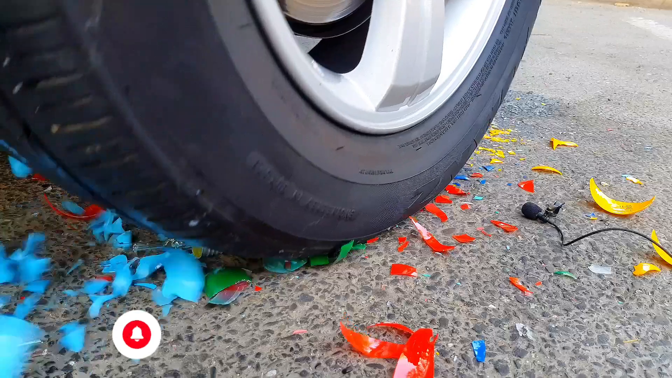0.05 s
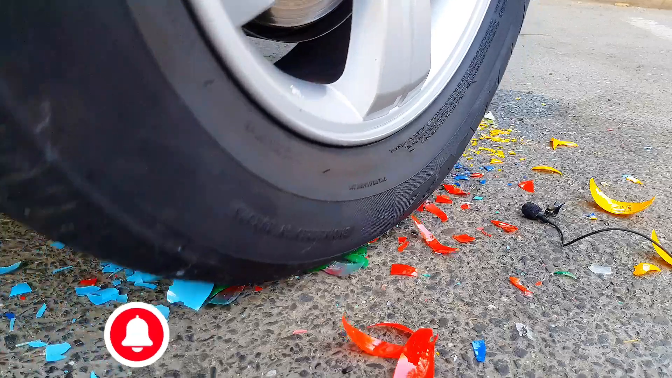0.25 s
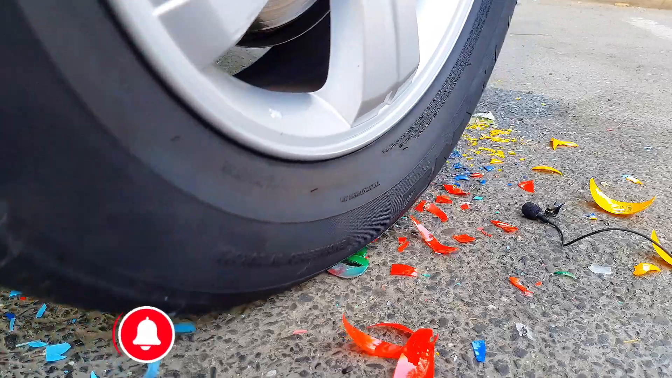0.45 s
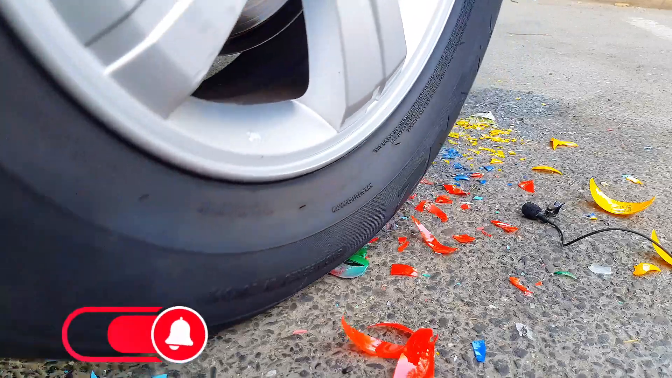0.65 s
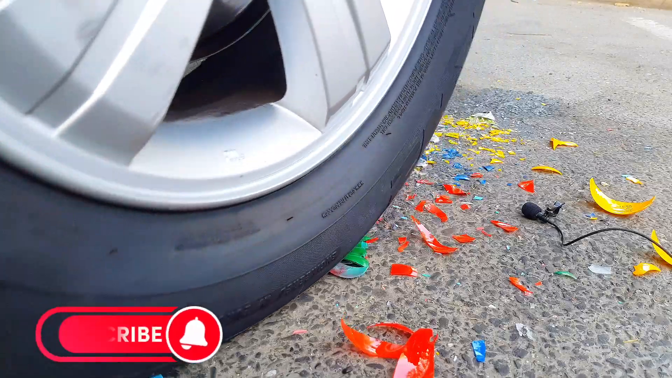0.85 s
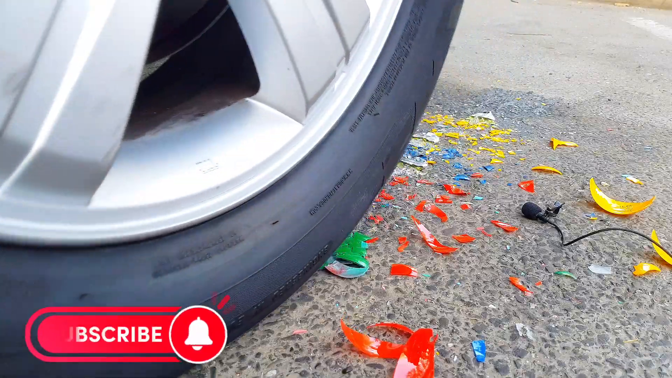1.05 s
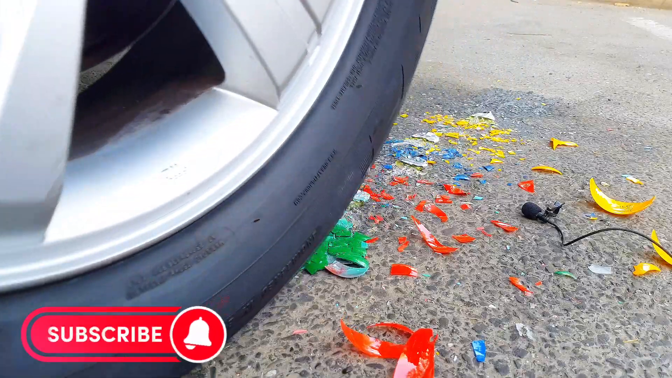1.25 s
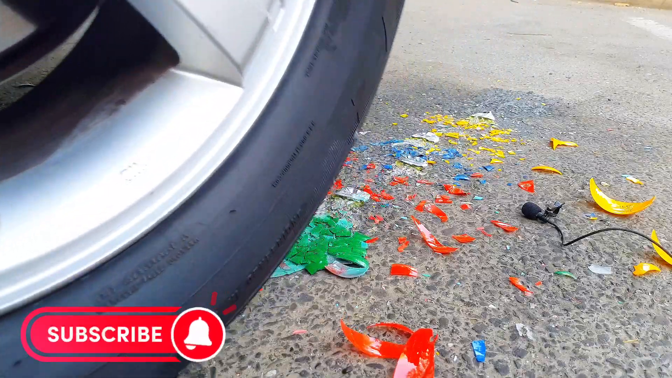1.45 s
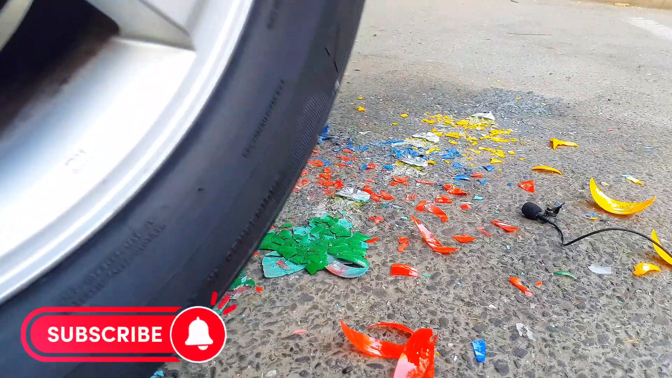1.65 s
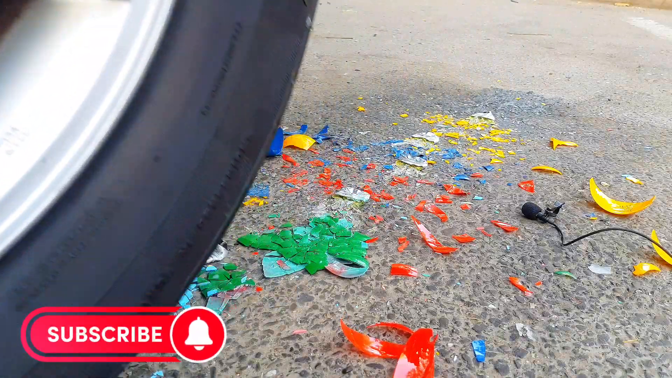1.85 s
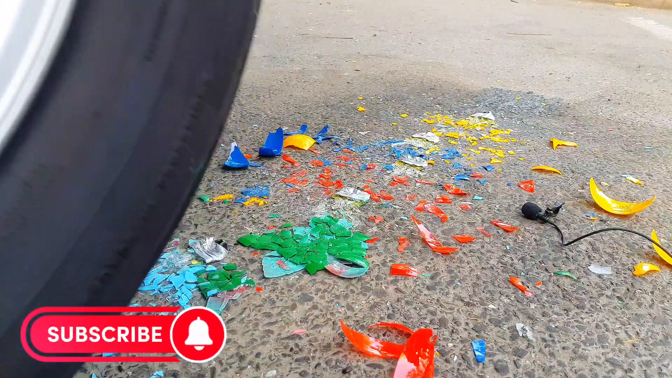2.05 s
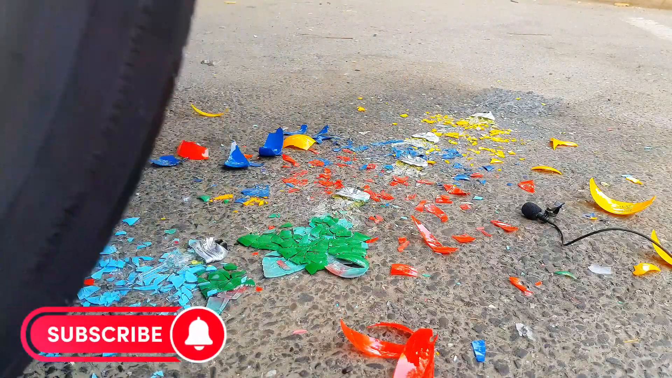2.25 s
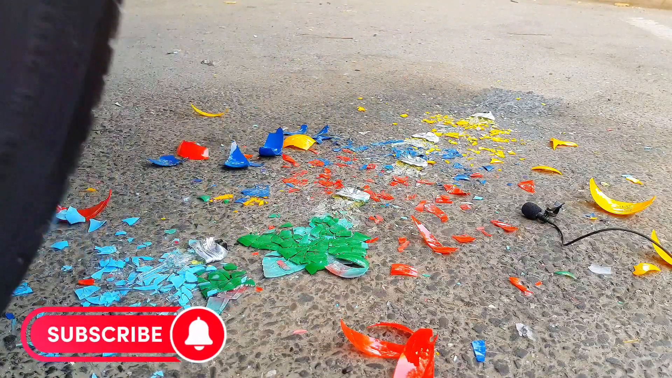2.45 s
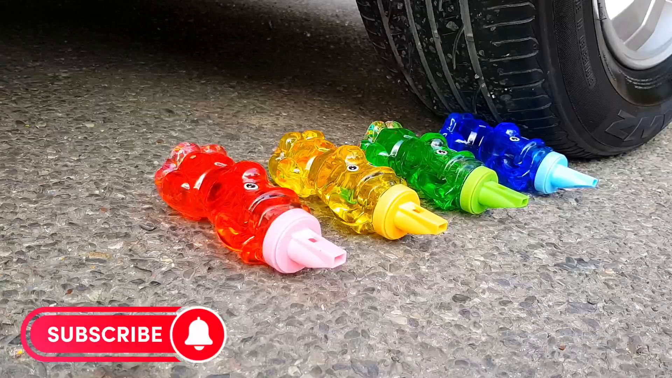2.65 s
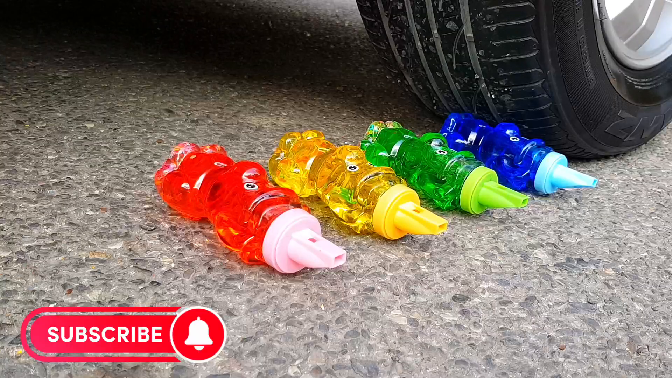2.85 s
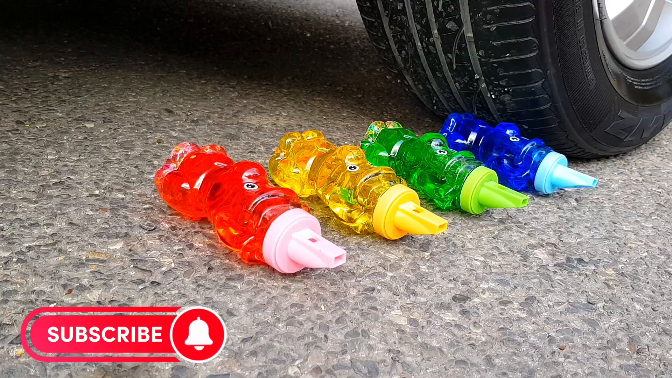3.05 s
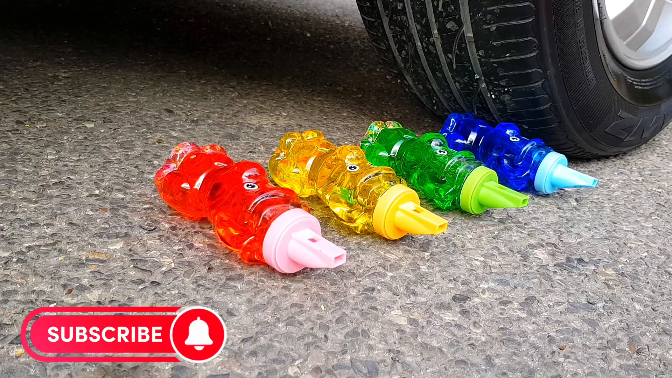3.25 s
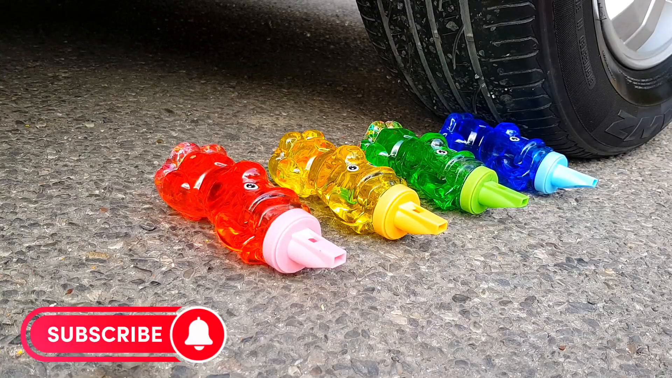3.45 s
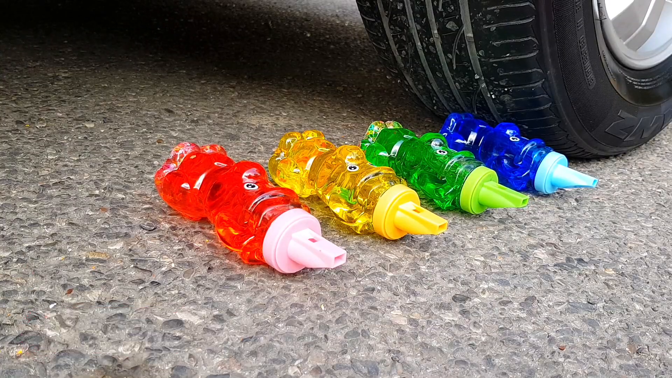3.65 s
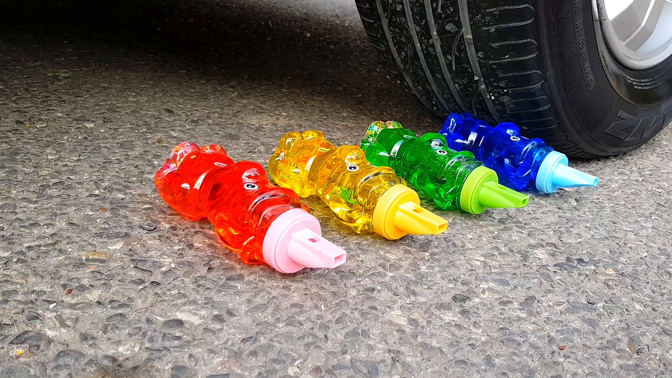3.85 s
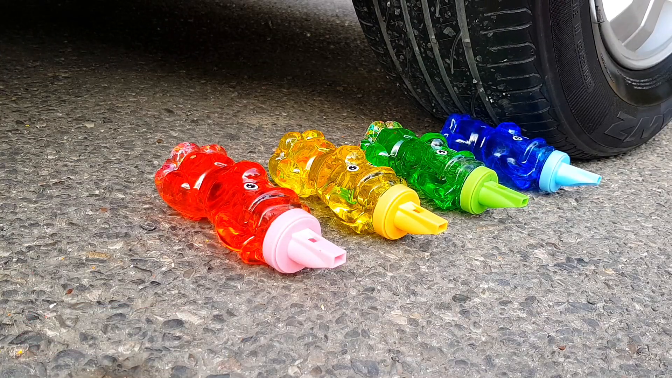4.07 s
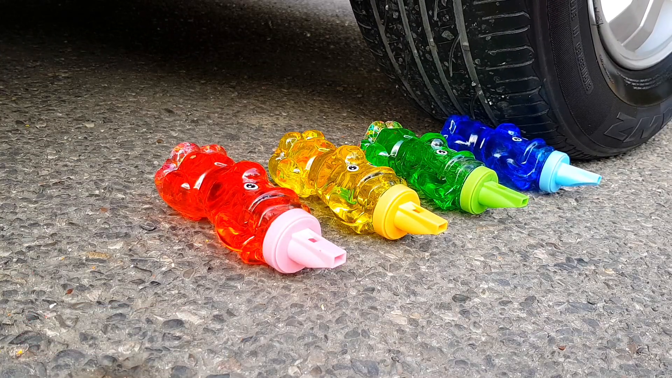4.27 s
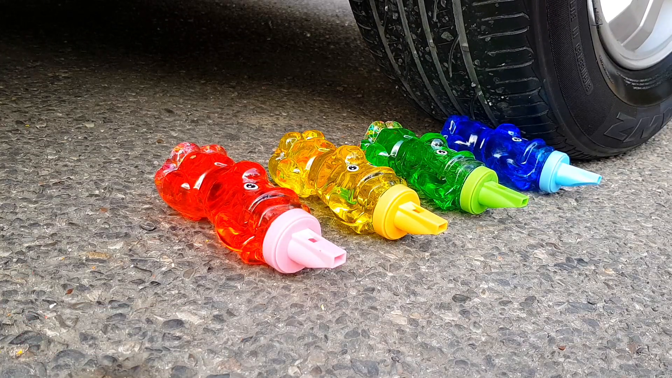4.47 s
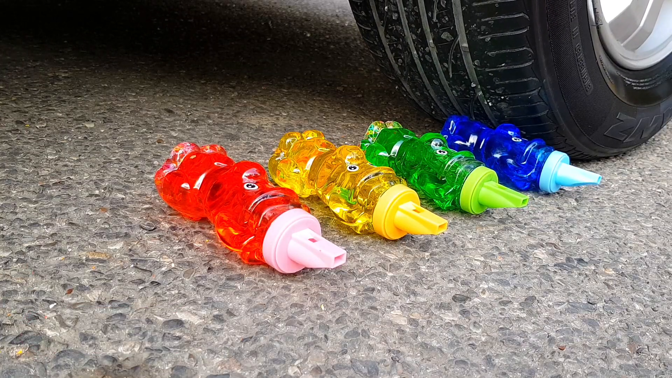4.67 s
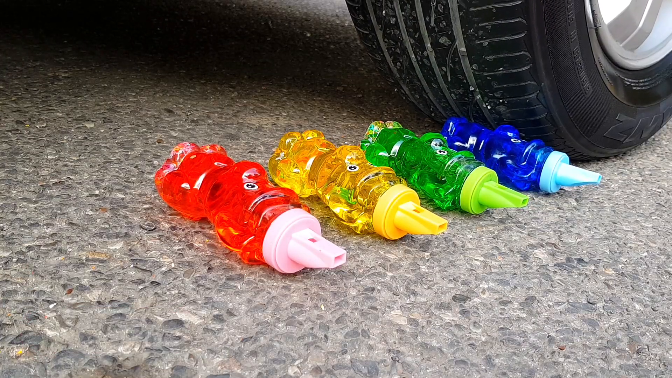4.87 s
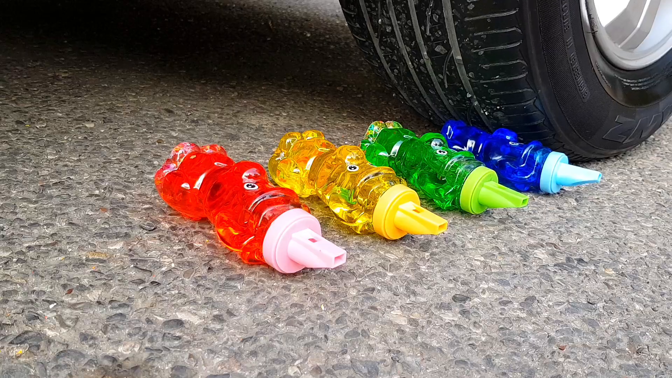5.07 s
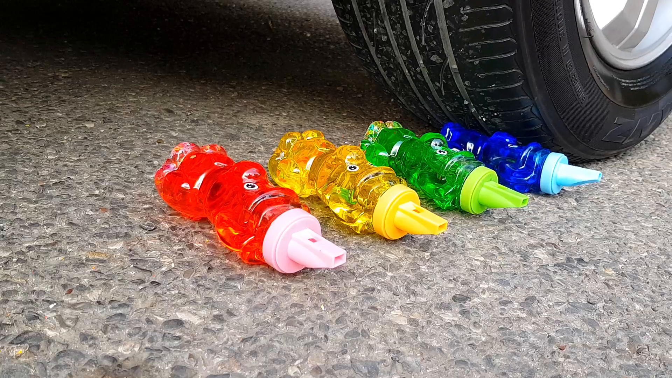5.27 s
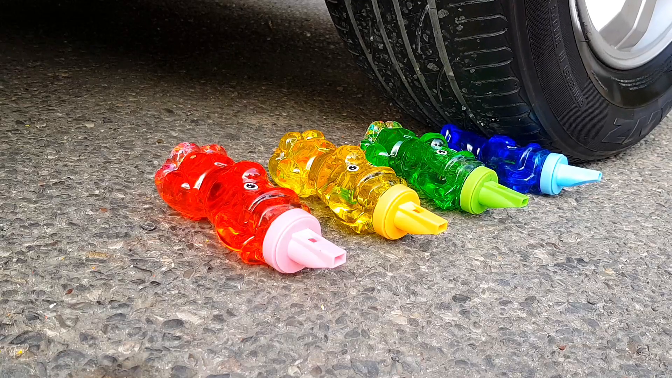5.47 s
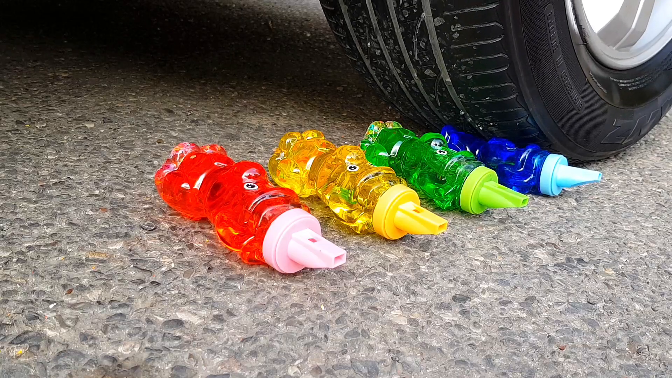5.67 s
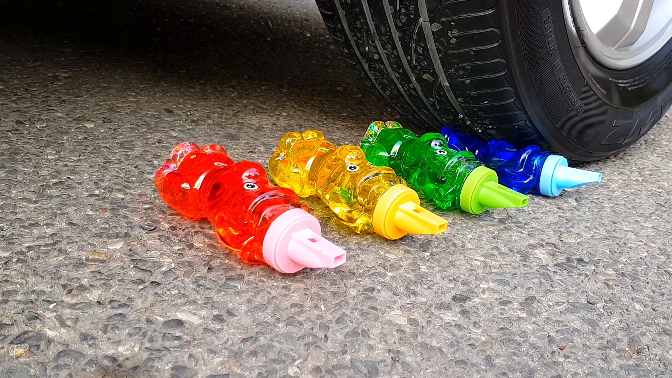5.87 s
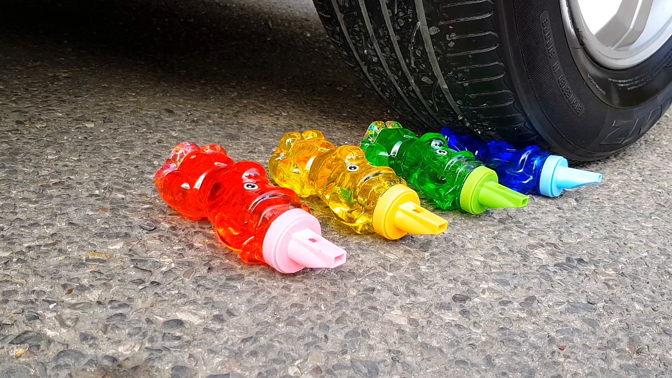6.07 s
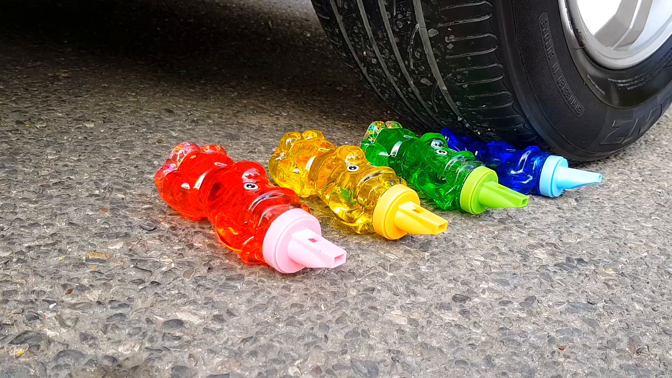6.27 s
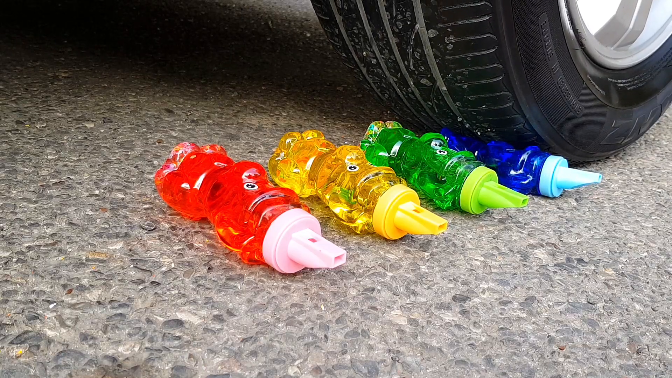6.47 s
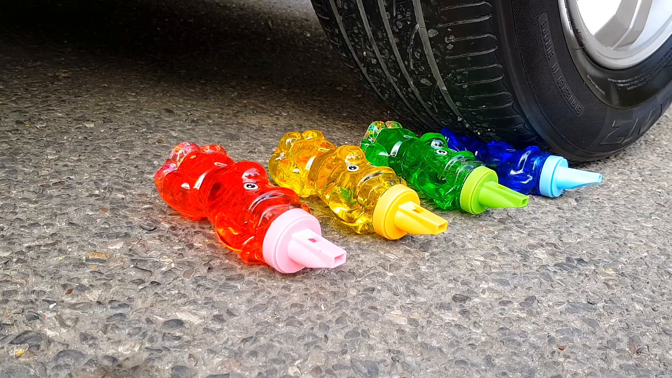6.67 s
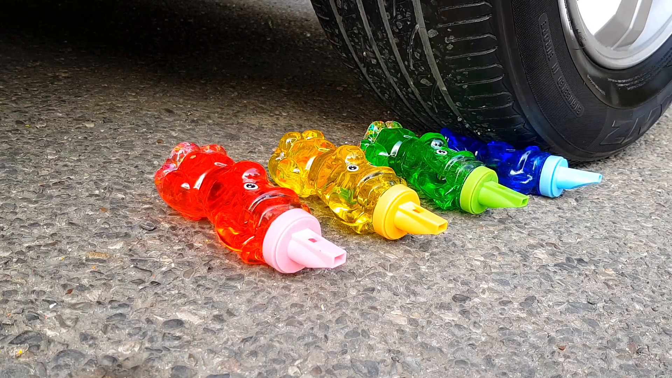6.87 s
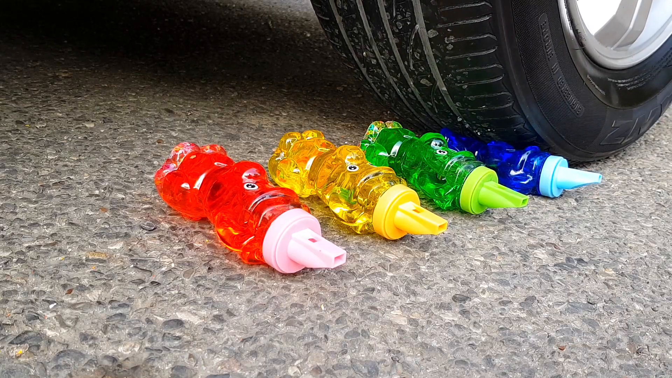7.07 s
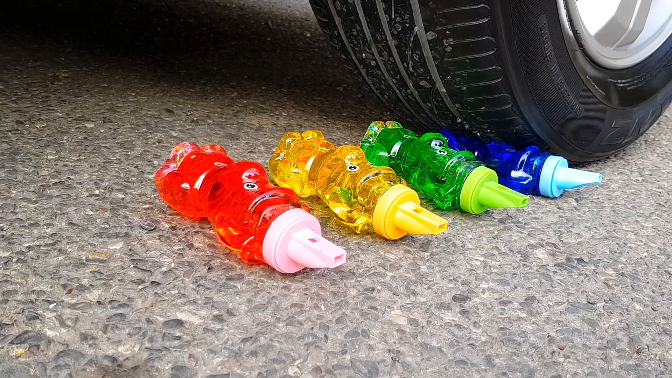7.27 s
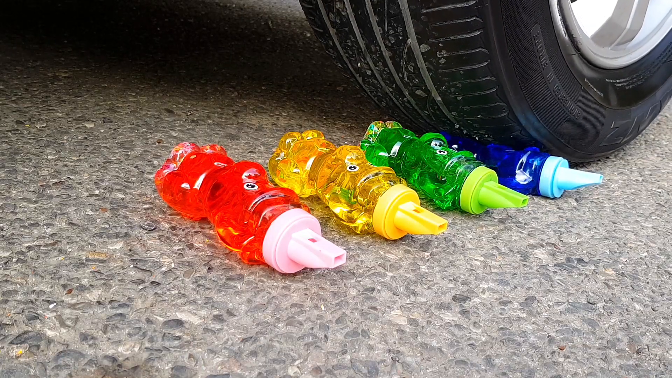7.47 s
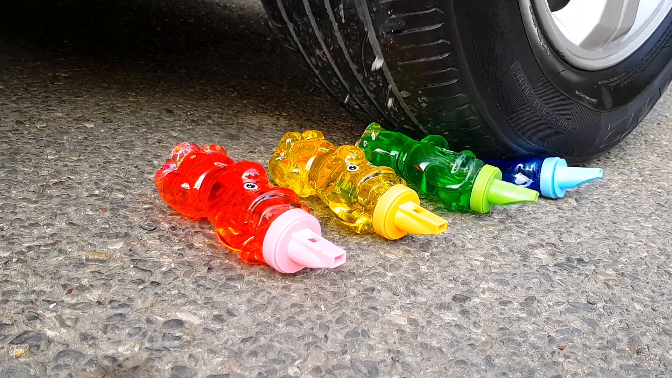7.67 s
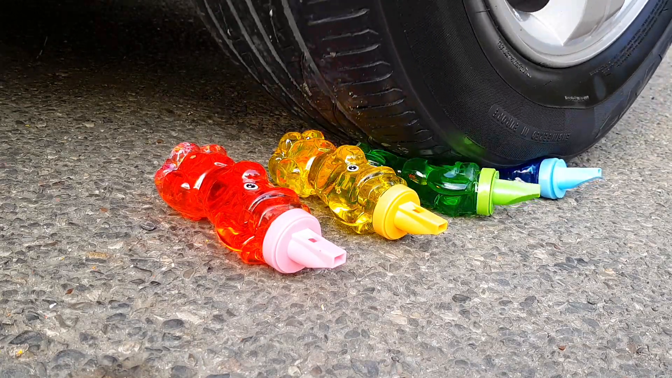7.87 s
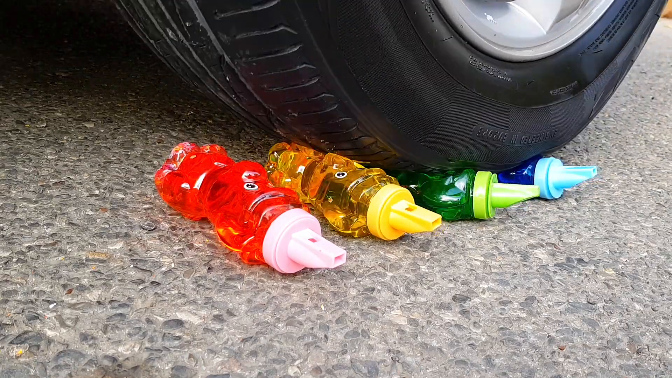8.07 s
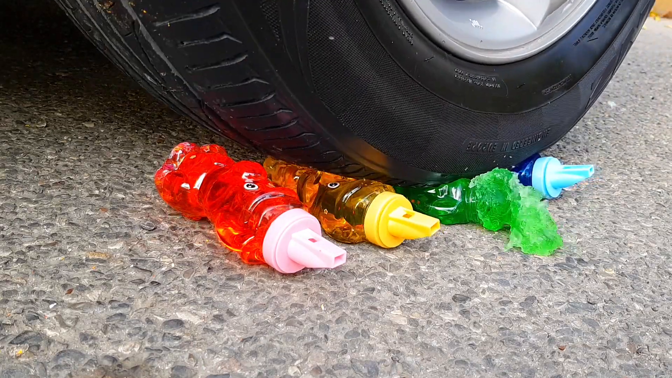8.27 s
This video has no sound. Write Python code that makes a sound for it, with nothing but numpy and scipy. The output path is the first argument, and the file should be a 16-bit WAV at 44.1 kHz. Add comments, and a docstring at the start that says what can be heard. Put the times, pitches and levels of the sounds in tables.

```python
"""Glass bulbs pop, crack and crunch on asphalt under the tyre of a creeping car, and loose shards tinkle.
Then, heard from closer to the engine, the car idles, revs up and climbs onto a row of jelly-filled
plastic bottles, which snap, burst and squirt. Breaks are filtered clicks with crumbling noise tails,
hollows and shards are damped sinusoids, grinding is a random train of grains, and the engine sums
harmonics of its firing rate with resonant knocks and coloured noise."""
import sys
import numpy as np
from scipy import signal
from scipy.fft import rfft, irfft, next_fast_len
from scipy.io import wavfile

SR = 44100
rng = np.random.default_rng(int(sys.argv[2]) if len(sys.argv) > 2 else 0)


def wav_record(signal):
    """Record a signal, one row per channel, as 16-bit PCM in the file named by sys.argv[1]."""
    frames = np.transpose(np.atleast_2d(signal))
    bounded = np.clip(frames, -1, 1)
    # unit amplitude maps onto the largest positive 16-bit level
    quanta = np.round(bounded * 32767).astype(np.int16)
    wavfile.write(sys.argv[1], SR, quanta)


N = 366900
TIME = np.arange(N) / SR
MOVE_S = 2.625  # the listening place moves from the bulbs to the bottles


def from_db(db):
    """Level to amplitude: 20 dB is a factor of ten."""
    return 10 ** (np.asarray(db) / 20)


def rms_one(x):
    """Normalisation of signal power: scale to rms 1."""
    return x / np.sqrt(np.mean(x ** 2) + 1e-20)


def in_time(rows):
    """Linear interpolation over time: one curve for each column after t/s."""
    s, *columns = np.transpose(rows)
    return [np.interp(TIME, s, column) for column in columns]


def add(out, s, sound):
    """Superposition: mix a sound in at a time in s."""
    at = max(round(s * SR), 0)
    out[..., at:at + sound.shape[-1]] += sound[..., :N - at]


def band(x, low_hz, high_hz):
    """Causal band-pass filtering."""
    edges_hz = [low_hz, min(high_hz, SR / 2 - 2000)]
    return signal.sosfilt(signal.butter(2, edges_hz, "band", fs=SR, output="sos"), x)


def resonate(x, hz, width_hz):
    """Resonance: a peak filter passes a narrow band around its centre."""
    return signal.lfilter(*signal.iirpeak(hz, hz / width_hz, fs=SR), x)


def colour(x, spectrum):
    """Minimum-phase filtering: the spectrum is met without sounding early; rms 1."""
    size = next_fast_len(N + SR // 2, True) // 2 * 2
    hz, db = np.transpose(spectrum)
    log_hz = np.log(np.maximum(np.arange(size // 2 + 1) * SR / size, 1))
    # outside the listed range the gain falls by 12 dB per octave
    beyond = np.abs(log_hz - np.clip(log_hz, np.log(hz[0]), np.log(hz[-1])))
    log_gain = np.log(from_db(np.interp(log_hz, np.log(hz), db))) - 2 * beyond
    # folding the cepstrum onto positive times gives minimum phase
    cepstrum = irfft(log_gain)
    cepstrum[size // 2:] = 0
    response = np.exp(2 * rfft(cepstrum))
    return rms_one(irfft(rfft(x, size) * response)[..., :N])


def drift(per_s):
    """Low-rate random modulation: lines between random knots, rms 1."""
    knots = rng.standard_normal(4000)
    return rms_one(np.interp(TIME * per_s, np.arange(len(knots)), knots))


def grains(per_s, spread_db):
    """Random impulse train: signed tiny breaks; a positive spread makes a few of them strong."""
    sizes = from_db(spread_db * np.minimum(rng.exponential(1, N), 4)) * rng.choice([-1, 1], N)
    return sizes * (rng.random(N) < per_s / SR)


def place(x, left_db, lag_s=0):
    """Level and time differences between two microphone ports; the right one hears it later."""
    left, right = np.broadcast_to(x, (2, x.shape[-1]))
    steps, ratio = np.arange(len(left)), from_db(left_db)
    delayed = np.interp(steps - lag_s * SR, steps, right, left=0)
    return np.array([ratio * left, delayed]) * 2 / (1 + ratio)


def port_noise(diffuse, echo_db=-23.0):
    """Comb filtering by echoes of road and underbody, with a diffuse share of its own at each port."""
    share = np.clip(diffuse, 0, 1)
    common = np.sqrt(1 - share) * rng.standard_normal(N)
    noise = common + np.sqrt(share) * rng.standard_normal((2, N))
    echoes = sum(np.roll(noise, round(s * SR), axis=1) for s in (.0033, .0059, .0087))
    return noise + from_db(echo_db) * echoes


# spectrum of the street noise: f/Hz, relative density/dB
STREET_SPECTRUM = [(150, 9), (330, 2), (500, -6.5), (900, -8), (2000, -13), (5000, -18.5), (8500, -17.5),
                   (12000, -22), (16000, -29)]


def street(level_db=-51.0):
    """Stationary coloured noise: the steady background beside the bulbs."""
    return from_db(level_db) * colour(rng.standard_normal(N), STREET_SPECTRUM)


# idle speed, which hunts a little: t/s, firing rate/(1/s)
IDLE_RATE = [(0, 23.3), (2.2, 23.25), (2.65, 22.75), (3.0, 23.48), (4.2, 23.8), (4.9, 23.2), (5.6, 23.15),
             (6.6, 23.85), (7.1, 23.6)]
# one push on the throttle: the revs climb to a top, then coast down
REV_TOP_S, REV_GAIN_PER_S, REV_RISE_S, REV_FALL_S = 7.64, 18.7, .305, .38


def firing_rate():
    """Fundamental frequency in firings per s: idle plus a bell-shaped climb and a long coast down."""
    since_top = TIME - REV_TOP_S
    climb = np.exp(-(since_top / REV_RISE_S) ** 2)
    coast = 1 / (1 + (since_top / REV_FALL_S) ** 2)
    return in_time(IDLE_RATE)[0] + REV_GAIN_PER_S * np.where(since_top < 0, climb, coast)


# level by cylinder in firing order: relative level/dB
CYLINDER_LEVELS = [0, -7, -1.5, -4]
# spectrum of the valve ticks: f/Hz, relative density/dB
VALVE_SPECTRUM = [(1200, 1.5), (1850, 5), (2200, -7), (2600, 3.5), (4200, -5.5), (5200, -8)]


def valves(turns, t60=.06, vary_db=2.5):
    """Periodic impact noise: a dry valve-gear tick per firing, some cylinders louder than others."""
    firing = turns.astype(int)
    level_db = np.take(CYLINDER_LEVELS, firing, mode="wrap") + vary_db * rng.standard_normal(1000)[firing]
    age_s = turns % 1 / np.gradient(turns) / SR
    ticks = rng.standard_normal(N) * from_db(level_db - 60 * age_s / t60)
    return rms_one(colour(ticks, VALVE_SPECTRUM))


# lines of the belt drive: f/Hz, level/dB relative to the coloured whirr
BELT_LINES = [(1809, -20), (3957, -20), (4081, -31), (4221, -19.5), (6363, -21.5)]


def whine(width_hz=16.0):
    """Narrow-band noise: belt and pulleys sing in faint, unsteady lines."""
    out = 0
    for hz, db in BELT_LINES:
        out = out + from_db(db) * rms_one(resonate(rng.standard_normal(N), hz, width_hz))
    return out


# spectrum of the whirr: f/Hz, relative density/dB
WHIRR_SPECTRUM = [(290, -14.5), (500, -5.5), (761, -7.5), (906, -11.5), (1280, -11), (1820, -12.5),
                  (2570, -17), (3020, -17), (4090, -19), (4730, -22.5), (7420, -20), (8830, -30.5),
                  (12500, -19), (15100, -24), (16000, -27)]
# ringing parts of the engine bay: f/Hz, bandwidth/Hz, relative level/dB
BAY_RESONANCES = [(1780, 590, 1.5), (2490, 69, 2), (3390, 250, -4.5)]


def engine_bay(turns, bay_db=-10.5, rattle_db=-13.5, valve_db=-9.5):
    """Resonance excited by noise: whirr, ringing parts and rattle, with valve ticks and belt whine."""
    air = port_noise(diffuse=0.83)
    bay = rms_one(sum(from_db(db) * resonate(air, hz, width) for hz, width, db in BAY_RESONANCES))
    rattle = rms_one(band(grains(per_s=110, spread_db=1.2), low_hz=1650, high_hz=2620))
    whirr = colour(air, WHIRR_SPECTRUM) + from_db(bay_db) * bay + from_db(rattle_db) * rattle
    return whirr + from_db(valve_db) * valves(turns) + whine()


# gas knocks as the valves open and shut: share of the firing cycle, relative level/dB, f/Hz, t60/s
GAS_KNOCKS = [(0.048, -1.5, 274, 0.028), (0.052, -10, 610, 0.024), (.27, -30, 900, .012),
              (.63, 0.5, 430, 0.013)]
KNOCK_VARY_DB, KNOCK_JITTER_S = 2.0, .00007


def knocks(turns):
    """Impulse response of the ducts: gas pulses ring them near fixed places in the cycle, unequally."""
    out, t = np.zeros(N), TIME[:SR // 16]
    firings = np.arange(int(turns[-1]))
    for share, db, hz, t60 in GAS_KNOCKS:
        ring = from_db(db - 60 * t / t60) * np.sin(2 * np.pi * hz * t) * (1 - np.exp(-t * hz * 2))
        times_s = np.interp(firings + share, turns, TIME)
        for s, (strength, late) in zip(times_s, rng.standard_normal((len(firings), 2))):
            add(out, s + KNOCK_JITTER_S * late, from_db(KNOCK_VARY_DB * strength) * ring)
    return rms_one(out)


HALF_ORDERS = (2.5, 3.5, 5.5)


def exhaust(turns, pipe, rough_db, smear, uneven=0.0, count=8):
    """Harmonic synthesis: firing orders weighted by the pipe; uneven firings add half orders."""
    hz, db = np.transpose(pipe)
    log_rate, boom, power = np.log(firing_rate()), 0, 0
    for order in list(range(1, count + 1)) + list(HALF_ORDERS):
        gain = np.interp(log_rate + np.log(order), np.log(hz), from_db(db), right=0)
        gain = gain * (uneven if order % 1 else 1)
        waver = from_db(rough_db * np.sqrt(order) / 2 * drift(12))
        # phases spread quadratically about the third order
        phase = 2 * np.pi * order * turns + smear * (order - 3) ** 2
        boom = boom + gain * waver * np.cos(phase)
        power = power + gain ** 2 / 2
    return boom / np.sqrt(power)


# response of the exhaust pipe beside the bulbs: f/Hz, relative level/dB
PIPE_AT_BULBS = [(23, -22), (47, 4), (70, 9), (93, 10.5), (117, -5.5), (140, 0.5), (163, -20), (210, -22)]
# response of the exhaust pipe beside the bottles: f/Hz, relative level/dB
PIPE_AT_BOTTLES = [(23, -30), (42, -13), (47, 0.5), (58, 0), (70, 7), (85, 6), (95, 1.5), (106, -1),
                   (118, -12), (128, -11), (141, -2.5), (153, -13), (170, -11.5), (210, -20.5), (300, -34)]
# spectrum of the rough chuff: f/Hz, relative density/dB
CHUFF_SPECTRUM = [(30, -14), (100, 3.5), (200, 0.5), (330, -3), (500, -3.5), (700, -11), (1000, -15.5),
                  (2500, -36)]
# the idle lopes, strong and weak firings in turn: t/s, relative level of the half orders/dB
LOPING = [(2.7, -20), (3.5, -17), (3.8, -11.5), (4.4, -10.5), (4.7, -18), (7.0, -20), (7.4, -26),
          (8.3, -24)]
# effort of the engine beside the bottles: t/s, level above idle/dB
ENGINE_EFFORT = [(2.66, 0.8), (4.14, 1.8), (4.85, -1.6), (7.07, 0), (7.28, 9.5), (7.65, 8.3), (7.82, 3.2),
                 (8.18, -4.5), (8.32, -16)]
# a low hum that sets in as the revs fall: t/s, relative level/dB
HUM_LEVEL = [(7.55, -74), (7.7, -34.5), (7.88, -37), (8.0, -59), (8.17, -39), (8.32, -44.5)]
HUM_HZ = 212.4
# knocks, chuff and whirr take a share of the effort's swing, and drop when the throttle closes
KNOCK_FOLLOWS, CHUFF_FOLLOWS, WHIRR_FOLLOWS = 0.75, 0.49, 0.18
CHUFF_COAST_DB, WHIRR_COAST_DB, THROTTLE_CLOSE_S = -3, -5, 0.18
FIRST_FIRING_S, FIRING_WOBBLE = .014, .007  # the wobble is in firing cycles, rms
PORT_LAG_S, ENGINE_LEFT_DB = .00045, 6.0


def engine(throb_db=1.0, flutter_db=-0.2):
    """Periodic source: four cylinders give boom, knocks and chuff; whirr joins beside the bottles."""
    rate = firing_rate()
    turns = np.cumsum(rate) / SR - FIRST_FIRING_S * rate[0] + FIRING_WOBBLE * drift(20)
    stroke = np.cos(2 * np.pi * turns)
    effort, = in_time(ENGINE_EFFORT)
    coasting = np.clip((TIME - REV_TOP_S) / THROTTLE_CLOSE_S, 0, 1)
    knock = knocks(turns)
    gas = port_noise(diffuse=0.36)
    chuff = rms_one(colour(gas, CHUFF_SPECTRUM) * from_db(throb_db * stroke))

    far = from_db(-40.0) * exhaust(turns, PIPE_AT_BULBS, rough_db=1.6, smear=0.17)
    far = far + from_db(-66) * chuff[0] + from_db(-58.0) * knock + street()

    lope = from_db(in_time(LOPING)[0])
    boom = exhaust(turns, PIPE_AT_BOTTLES, rough_db=1.8, smear=0.25, uneven=lope)
    near = from_db(-30.0 + effort) * boom
    near = near + from_db(-45.5 + KNOCK_FOLLOWS * effort + CHUFF_COAST_DB * coasting) * knock
    near = near + from_db(-38.5 + CHUFF_FOLLOWS * effort + CHUFF_COAST_DB * coasting) * chuff
    near = near + from_db(in_time(HUM_LEVEL)[0]) * np.sin(2 * np.pi * HUM_HZ * TIME)

    whirr_level = -44.0 + WHIRR_FOLLOWS * effort + WHIRR_COAST_DB * coasting
    whirr = engine_bay(turns) * from_db(whirr_level + flutter_db * stroke)
    near = place(near, ENGINE_LEFT_DB, PORT_LAG_S / 2) + place(whirr, 7.5, PORT_LAG_S)
    return np.where(TIME < MOVE_S, far, near)


# spectrum of the spray: f/Hz, relative density/dB
SPRAY_SPECTRUM = [(1000, -3), (2500, -10), (5000, -8), (8500, -15), (11000, -6.5), (14000, -2),
                  (16000, -6.5)]
# air and jelly forced past a cap: t/s at the height, relative level/dB, swell over 60 dB/s
CAP_SQUIRTS = [(7.095, -36, 0.026), (8.06, -37, .015), (8.15, -27.5, 0.2), (8.187, -17.5, 0.05)]
SQUIRT_T60_S = 0.036


def leak(left_db=2.0):
    """Pressure-driven jet noise: each squirt at the cap spits and fizzes, swelling, then dying quickly."""
    spits = np.array([grains(per_s=3600, spread_db=-1.5) for port in range(2)])
    spray = colour(spits, SPRAY_SPECTRUM)
    flow = 0
    for s, db, swell_s in CAP_SQUIRTS:
        distance = np.maximum((s - TIME) / swell_s, (TIME - s) / SQUIRT_T60_S)
        flow = flow + from_db(db - 60 * np.minimum(distance, 2))
    return place(spray * flow, left_db)


# modes of loose shards, one list for each shard: f/Hz, relative level/dB, t60/s
SHARD_MODES = [
    [(3070, -12.5, 0.29), (4070, -14, 0.13), (7130, 0, 0.11), (8700, -7, 0.11), (11175, 5, 0.081),
     (14640, -24, .12)],
    [(7530, -3.5, 0.31), (9550, 3, 0.13), (13400, -18, .1)],
    [(7100, -2.5, 0.2), (9600, -9, 0.27), (13635, 8, 0.15), (15620, -2, .16)],
    [(8450, 3, 0.19), (11650, -5, 0.16), (15300, -14, .15)],
    [(3811, -14, .05), (4872, -18, .08), (6110, -16, 0.081), (9744, 11, .06), (12780, 0, .08)],
]
# shards touch the road: t/s, relative level/dB, shard (a-e, the lists above), hardness/(dB per octave)
SHARD_LANDINGS = [(0.409, -36, "e", 1), (1.653, -30, "c", -4), (1.669, -46, "a", -5), (1.715, -29, "a", 8),
                  (1.778, -66.5, "b", 35), (1.855, -57, "a", 6), (1.925, -37, "a", 0), (1.959, -40, "a", 4),
                  (1.96, -54, "d", 16), (2.012, -50, "a", 1), (2.052, -56, "a", 5), (2.055, -45, "d", 3),
                  (2.061, -40, "b", 5), (2.095, -56, "a", 11), (2.137, -46, "b", 4), (2.228, -53, "d", 0),
                  (2.302, -52.5, "a", 13), (2.4, -61, "d", 4), (2.475, -55, "d", -4), (2.56, -59, "d", 0)]
# modes come in close pairs that beat: largest split is about this share of f; the twin is weaker
PAIR_SPLIT, PAIR_SHARE = .004, .4


def tinkles(vary_db=1.0, rise_s=0.0017):
    """Modal synthesis: shards ring at each touch; a harder touch favours the upper modes."""
    out, t = np.zeros(N), TIME[:SR // 2]
    for s, db, shard, hardness_db in SHARD_LANDINGS:
        for hz, mode_db, t60 in SHARD_MODES["abcde".index(shard)]:
            octaves = np.log2(hz / 7000)
            level_db = db + mode_db + hardness_db * octaves + vary_db * rng.standard_normal()
            envelope = from_db(level_db - 60 * t / t60) * (1 - np.exp(-t / rise_s))
            twin_hz = hz * (1 + PAIR_SPLIT * rng.uniform(-1.3, 1))
            pair = np.sin(2 * np.pi * hz * t) + PAIR_SHARE * np.cos(2 * np.pi * twin_hz * t)
            add(out, s, envelope * pair)
    return out


# splinters ground under the tread: t/s, relative grinding level/dB, relative splinter level/dB
CRUNCH_LEVELS = [(0.0, -16, -13.5), (0.04, -27.5, -33), (0.11, -38, -38.5), (0.3, -38, -31),
                 (0.44, -34, -33), (0.54, -36.5, -38), (0.8, -34.5, -36.5), (0.88, -51, -50),
                 (0.97, -43, -53), (1.1, -57, -55), (1.2, -43, -39), (1.222, -72, -59), (1.45, -80, -75)]
# spectrum of the grinding: f/Hz, relative density/dB
GRIND_SPECTRUM = [(120, 1.5), (220, -0.5), (350, -8), (650, 1), (1100, -1.5), (1500, -14), (2000, -13),
                  (3000, -14), (6000, -54)]
# spectrum of the breaking splinters: f/Hz, relative density/dB
SPLINTER_SPECTRUM = [(1180, -36), (2000, -7), (3170, -4), (5490, -2), (10100, -0.5), (11400, -10),
                     (13200, -4), (15200, -12), (16000, -29)]
SLIPS_PER_S, SPLINTERS_PER_S, GRAIN_SPREAD_DB = 600, 800, 3.6


def crunch(grind_db=-1.0, splinter_db=-2.5, tick_db=-10.0, clump_db=4.0):
    """Granular friction: splinters grind in clumps and tick singly until the tyre rolls off them."""
    grind_level, splinter_level = in_time(CRUNCH_LEVELS)
    fade = from_db(-25 * np.maximum(TIME - CRUNCH_LEVELS[-1][0], 0))
    clumps = rms_one(from_db(clump_db * np.minimum(drift(220), 1.5)))
    slips = colour(grains(SLIPS_PER_S, GRAIN_SPREAD_DB), GRIND_SPECTRUM)
    grind = from_db(grind_level + grind_db) * slips
    breaks = colour(grains(SPLINTERS_PER_S, GRAIN_SPREAD_DB), SPLINTER_SPECTRUM)
    splinters = from_db(splinter_level + splinter_db) * breaks
    # smaller splinters tick higher
    sizes_hz = np.geomspace(2200, 12000, 7)
    ticks = rms_one(sum(band(grains(per_s=45, spread_db=2.5), hz / 1.3, hz * 1.3) for hz in sizes_hz))
    return fade * (clumps * (grind + splinters) + from_db(splinter_level + tick_db) * ticks)


# trapped air let out, and the low thumps of the tyre dropping after a burst: t/s, relative level/dB, f/Hz
POPS_AND_THUMPS = [(0.0, -7.5, 605), (0.004, -22, 45), (0.031, -14.5, 98), (0.126, -9, 446), (0.126, -15, 193),
                   (0.167, -19.5, 175), (0.185, -16.5, 108), (0.29, -22, 125), (0.2, -23, 302), (0.328, -33, 257),
                   (0.271, -7, 1080), (0.285, -3, 910), (0.3877, -33, 1130), (0.668, -10.5, 643),
                   (0.7848, -8, 773), (0.8497, -16, 1650), (0.8808, -14, 1930), (1.1309, -18, 1320),
                   (1.809, -15, 1760), (1.957, -29, 234), (6.066, -23, 1390), (7.4978, -7, 1020),
                   (7.499, -10, 2770), (7.6466, -9.5, 587), (7.646, -5, 276), (7.655, -7, 55), (7.662, -3.5, 364),
                   (7.967, -17.5, 2550), (8.1745, -5.5, 676), (8.175, -5, 2200), (8.181, -7, 62)]
# larger hollows ring longer (t60 at 1 kHz, power of wavelength); jelly shortens the ring to a share
POP_T60_S, POP_SIZE_POWER, JELLY_RING_SHARE = 0.022, 0.67, 0.42


def pops(rough=0.48, bottle_left_db=6.0):
    """Damped cavity resonance: a bursting hollow thumps with a short, ragged ring."""
    out, t = np.zeros((2, N)), TIME[:SR // 4]
    for s, db, hz in POPS_AND_THUMPS:
        size = 1000 / hz
        t60 = POP_T60_S * size ** POP_SIZE_POWER * (JELLY_RING_SHARE if s > MOVE_S else 1)
        rush = rms_one(band(rng.standard_normal(len(t)), hz / 2, hz * 2))
        envelope = from_db(db - 60 * t / t60) * (1 - np.exp(-t * hz * 2))
        pop = envelope * (np.sin(2 * np.pi * hz * t) + rough * rush)
        add(out, s, place(pop, bottle_left_db * (s > MOVE_S)))
    return out


def shares(brightness_db, crack_db):
    """Energy partition among body, crack and sizzle in dB: a bright break trades body for sizzle."""
    tilt_db = np.array([-brightness_db, crack_db, brightness_db])
    return tilt_db - 10 * np.log10(np.sum(from_db(tilt_db) ** 2))


CRUMBS_PER_S, SCATTER_SHARE = 450, .15  # the share of a tail's power that is diffuse scatter


def fracture(levels_db, tail_db, bands, click):
    """Impulsive energy release: a snap, then separate crumbs; each band rings for its own time."""
    t, out = TIME[:SR // 8], 0
    falls = rng.random(len(t)) < CRUMBS_PER_S / SR
    for k, (level_db, (low_hz, high_hz, t60, tail_t60)) in enumerate(zip(levels_db, bands)):
        snap, sizes, scatter = rng.standard_normal((3, len(t)))
        snap = snap * from_db(-60 * t / t60)
        impulse = (-1) ** k * click * (t == 0)
        snap = band(snap / np.linalg.norm(snap) - impulse, low_hz, high_hz)
        attack_rms = np.sqrt(np.mean(snap[:SR // 200] ** 2))
        crumbs = np.sqrt(1 - SCATTER_SHARE) * rms_one(falls * np.tanh(sizes))
        crumbs = crumbs + np.sqrt(SCATTER_SHARE) * scatter
        tail = rms_one(band(crumbs, low_hz, high_hz))
        tail = tail * from_db(-60 * t / tail_t60) * (1 - np.exp(-t / 0.005))
        out = out + from_db(level_db) * (snap / attack_rms + from_db(tail_db + 8.0) * tail)
    return out


# snaps and splats: t/s, relative level/dB, brightness/dB, relative tail level/dB,
# left-right difference/dB, relative wall ring level/dB, centre of the ring f/Hz
BOTTLE_BREAKS = [(6.0684, -27, -14, -15.5, 6, -36, 2300), (7.4968, -26, -2, -6.5, 6, -17, 1250),
                 (7.6466, -16, -3.5, -10, 3, -15, 370), (7.6547, -21, -1.5, -16, 28, -21.5, 450),
                 (7.7862, -28.5, -4, -8, 6, -42, 2400), (7.901, -24, -11.5, -15.5, 6, -33, 1000),
                 (7.9656, -37, -2, -4.5, 7, -31, 2700), (8.0564, -38, 3, -25, 7, -37, 900),
                 (8.1745, -17.5, -4, -16, -13, -19, 1400), (8.185, -23.5, -5, -15, 23, -21, 2400),
                 (8.194, -24, -0.5, -14, 25, -21, 2200), (8.211, -39, -1, -8, 20, -27, 2000),
                 (8.2331, -17, 9, -25, -4, -42, 3000), (8.245, -36.5, -16, -15, 9, -31, 1300)]
# dull ring of a bottle's wall: f/Hz, relative level/dB, t60/s
WALL_MODES = [(310, -3, .09), (361, 0, .12), (425, -1, .17), (619, -4, .08), (750, -2, .06), (1090, 0, .05),
              (1250, 1, .04), (1590, -2, .04), (1990, 0, .04), (2380, 0, .04), (2750, -2, .04),
              (3570, -5, .035)]
RING_WIDTH_OCTAVES = 0.59


def bottles(level_db=-6.5, scatter_db=3.0, ring_db=1.5):
    """Buckling and modal excitation: snaps ring nearby wall modes; tyre and road scatter to each port."""
    out, t = np.zeros((2, N)), TIME[:SR // 8]
    # body, crack and sizzle: low f/Hz, high f/Hz, t60/s, tail t60/s
    bands = [(435, 1120, 0.0092, 0.13), (1390, 4950, 0.037, 0.12), (8900, 26000, 0.021, 0.078)]
    hz, mode_db, t60 = np.transpose(WALL_MODES)[..., None]
    modes = from_db(mode_db - 60 * t / t60) * np.sin(2 * np.pi * hz * t)
    for s, db, brightness_db, tail_db, left_db, wall_db, centre_hz in BOTTLE_BREAKS:
        levels_db = db + shares(brightness_db, crack_db=-2.0)
        direct = fracture(levels_db, tail_db, bands, click=1.2)
        scatter = np.array([fracture(levels_db, tail_db, bands, click=0) for port in range(2)])
        nearness = np.exp(-(np.log2(hz / centre_hz) / RING_WIDTH_OCTAVES) ** 2)
        strengths = nearness * rng.choice([-1, 1], hz.shape)
        wall = from_db(wall_db + ring_db) * np.sum(strengths * modes, axis=0)
        add(out, s, place(direct + wall + from_db(scatter_db) * scatter, left_db))
    return from_db(level_db) * out


# cracks in glass: t/s, level/dB, brightness/dB, relative crumbling tail level/dB
GLASS_CRACKS = [(0.008, -32, 0, 5), (0.027, -24, 14, -4), (0.05, -23, 17, -7), (0.0687, -17.5, 8, -5),
                (0.076, -31, 3, -16), (0.0926, -27.5, 14, -23), (0.105, -26, 2, -27),
                (0.1283, -17.5, 5, -14), (0.138, -22, 7, -16), (0.1452, -33, 18, -7), (0.157, -13, 4.5, -7),
                (0.174, -20, 4, -7), (0.189, -24.5, 8, -17), (0.206, -32, 1, -12), (0.236, -34, -1, -4),
                (0.2407, -15, 11, -7), (0.247, -23, -8, -32), (0.271, -21.5, -3, -20),
                (0.2789, -14.5, 3, -9), (0.2858, -13.5, -3, -14), (0.3058, -17.5, 2.5, -14),
                (0.335, -32, 12, -17), (0.3563, -29, 5, 0), (0.373, -31, 1.5, -1), (0.3889, -21.5, -12, -8),
                (0.423, -29, 18, -23), (0.4336, -22, 7, -4.5), (0.454, -22.5, 9, 1),
                (0.4579, -20, -14, -13), (0.476, -16.5, 15, -31), (0.486, -24, -1, -17),
                (0.5061, -28.5, 1, -6), (0.5462, -28, 10, -2), (0.5604, -29.5, -2, -5),
                (0.585, -17, -1, -12.5), (0.6106, -35, 2, -14), (0.6676, -16.5, -1, -15),
                (0.7155, -20, -2, -5.5), (0.732, -28, -9, -16), (0.747, -36, -5, -16),
                (0.767, -30, -1, -14), (0.777, -32, 5, -18), (0.7838, -17, -12, -14),
                (0.8003, -26, -10, -14), (0.809, -20.5, 0, -18), (0.8194, -28, -7, -13),
                (0.8492, -19.5, -10, -16), (0.852, -34, 11, -18), (0.8671, -25, -1, -14),
                (0.8819, -20.5, -2, -14), (0.885, -39, 6, -18), (0.891, -32, 1, -14),
                (0.896, -28, 0.5, -10), (0.909, -29, -10, -20), (0.9346, -28, -3.5, -30),
                (0.945, -34.5, -1, -12), (0.999, -40.5, -3, -2), (1.017, -37.5, -2.5, -0.5),
                (1.035, -29, -10.5, -1.5), (1.078, -34, -3.5, -5), (1.088, -38, -1, -4),
                (1.098, -29, -6, -10), (1.111, -33.5, 1.5, -3), (1.131, -29.5, 0, -21),
                (1.155, -32.5, -7, -27), (1.172, -35.5, 4, -5), (1.2333, -33.5, -1, -20),
                (1.243, -51, 12, -12), (1.26, -38, 0.5, -8), (1.275, -48, 1, -16), (1.292, -48, 2, -14),
                (1.332, -49, 3, 2), (1.384, -50, 0, -8), (1.418, -58, 10, -11), (1.4356, -38.5, -2, -11),
                (1.4586, -44, 4, -4), (1.497, -51, 3, -17), (1.5185, -28, 3.5, -9), (1.575, -40.5, -0.5, 0),
                (1.6514, -15.5, 10, -12.5), (1.7515, -32.5, 5, -12), (1.8096, -30, -3, -11),
                (1.833, -42, 6, -4), (1.899, -62, 6, -10), (2.044, -50, 17, -8), (1.9577, -33, 4, -4),
                (2.1336, -46, -4, -5), (2.1649, -32.5, -4, -4.5), (2.279, -46, 4, 8.5),
                (2.375, -51, -5, -4), (2.409, -56, 0, -1)]
# modes of the large curved pieces of the bulbs: f/Hz, relative level/dB, t60/s
PIECE_MODES = [(3350, -16, .1), (4520, -3, .15), (5170, -7, .12), (6850, -3, 0.15), (7100, -5, .15),
               (8340, -8, 0.1), (9150, -4, 0.1), (9800, -1, .16), (10150, -1, .15), (10900, -7, .12),
               (11500, -5, .12), (13050, -4, .13)]
# ring of the pieces relative to a crack's sizzle, and the scale of its spread from mode to mode
PIECE_RING_DB, PIECE_VARY_DB = -24.5, 7.0


def glass():
    """Brittle fracture: bulb walls give way crack after crack; while the pieces are large, they ring."""
    out, t = np.zeros(N), TIME[:SR // 5]
    # body, crack and sizzle: low f/Hz, high f/Hz, t60/s, tail t60/s
    bands = [(554, 1410, 0.019, 0.066), (1610, 4870, 0.019, 0.064), (5500, 12600, 0.015, 0.049)]
    hz, mode_db, t60 = np.transpose(PIECE_MODES)[..., None]
    modes = from_db(mode_db - 60 * t / t60) * np.sin(2 * np.pi * hz * t)
    for s, db, brightness_db, tail_db in GLASS_CRACKS:
        levels_db = db + shares(brightness_db, crack_db=-2.0)
        add(out, s, fracture(levels_db, tail_db, bands, click=1.3))
        vary_db = PIECE_VARY_DB * rng.uniform(-8.0, 1, len(modes))
        strengths = from_db(levels_db[-1] + PIECE_RING_DB + vary_db) * rng.choice([-1, 1], len(modes))
        pieces_large = s < CRUNCH_LEVELS[-1][0]
        add(out, s, strengths @ modes * pieces_large)
    return out


def scene():
    """Linear superposition: the engine under the breaking bulbs, then under the bursting bottles."""
    return engine() + leak() + tinkles() + crunch() + pops() + bottles() + glass()


def record(dry):
    """Overload and band limiting: the highest peaks clip, and the top is cut above 16 kHz."""
    clipped = np.clip(dry, -.95, .95)
    return signal.sosfilt(signal.ellip(10, .1, 80, 16000, fs=SR, output="sos"), clipped)


dry = scene()
out = record(dry)
wav_record(out)
```